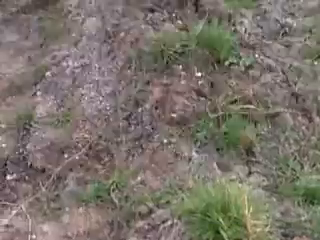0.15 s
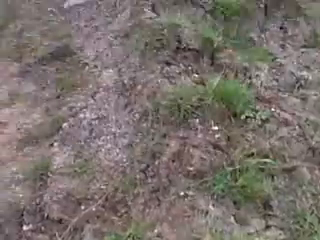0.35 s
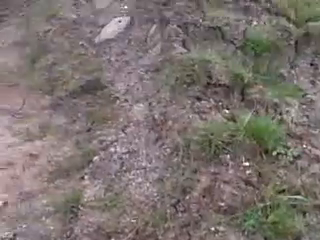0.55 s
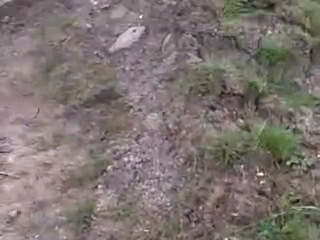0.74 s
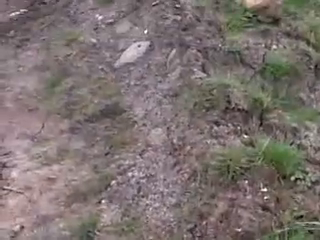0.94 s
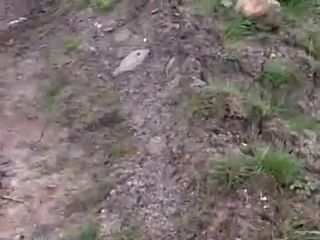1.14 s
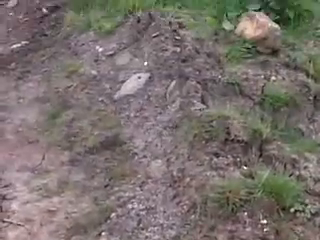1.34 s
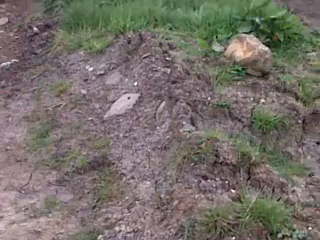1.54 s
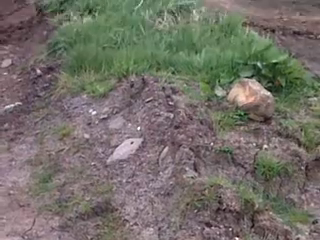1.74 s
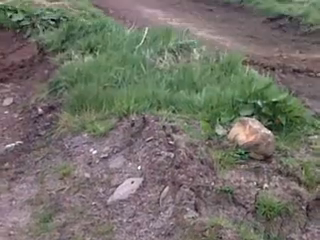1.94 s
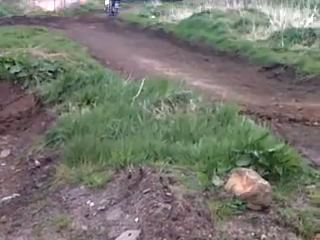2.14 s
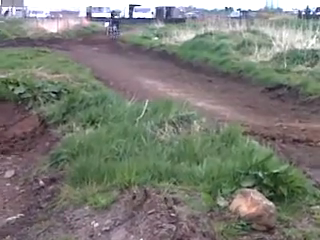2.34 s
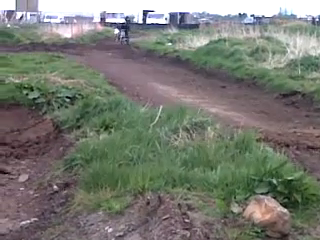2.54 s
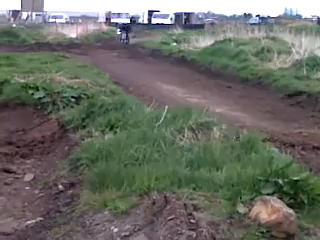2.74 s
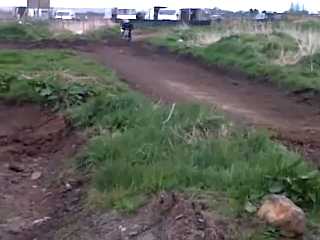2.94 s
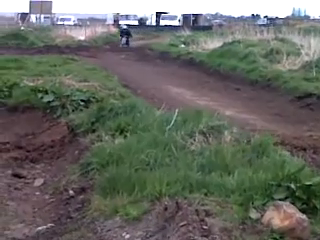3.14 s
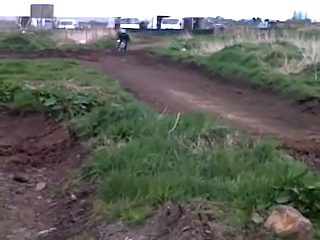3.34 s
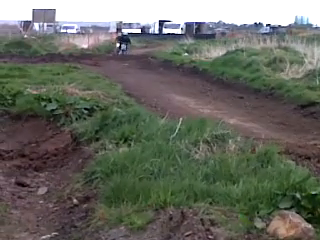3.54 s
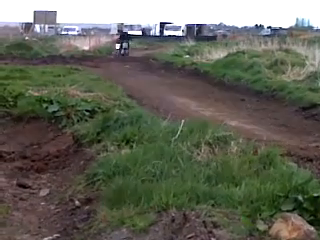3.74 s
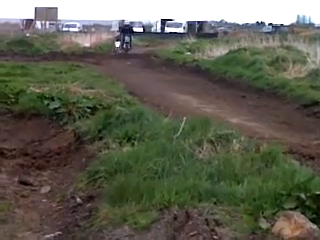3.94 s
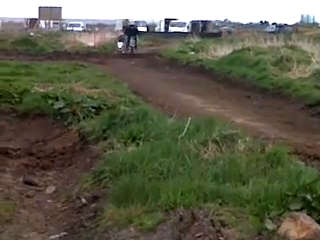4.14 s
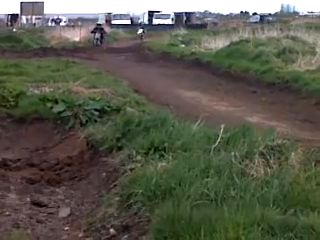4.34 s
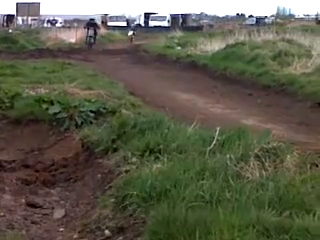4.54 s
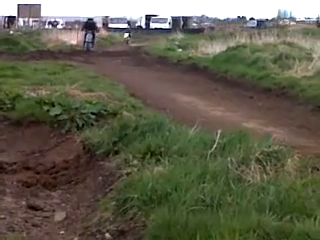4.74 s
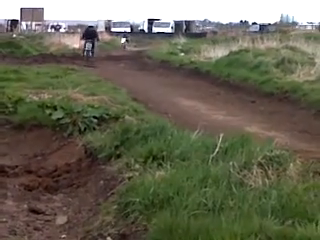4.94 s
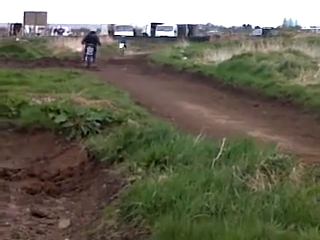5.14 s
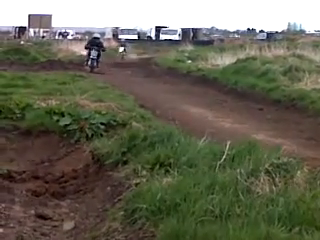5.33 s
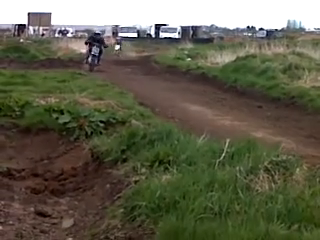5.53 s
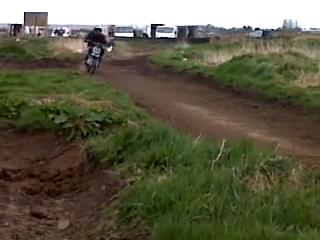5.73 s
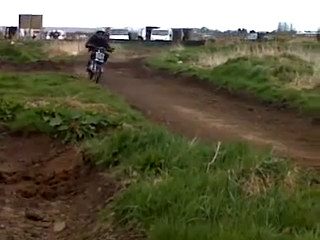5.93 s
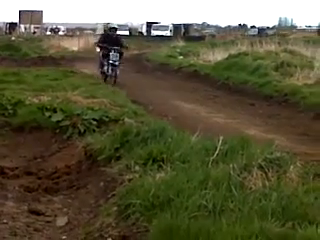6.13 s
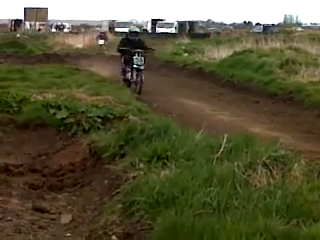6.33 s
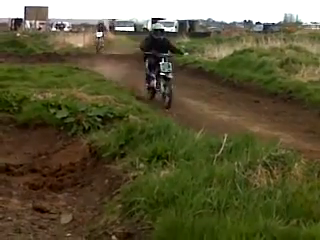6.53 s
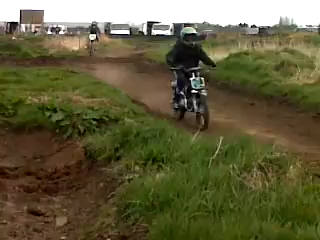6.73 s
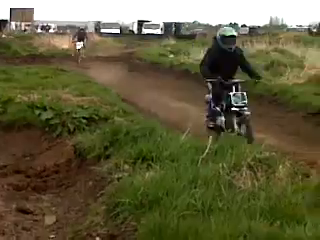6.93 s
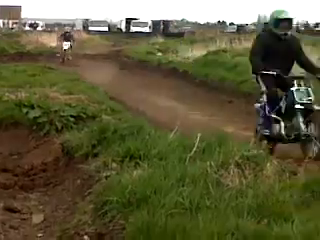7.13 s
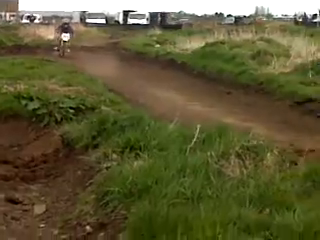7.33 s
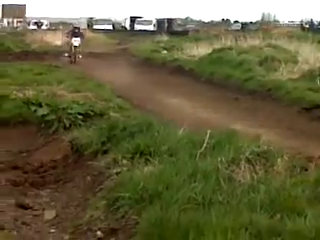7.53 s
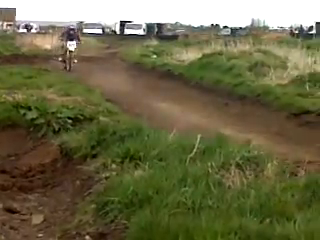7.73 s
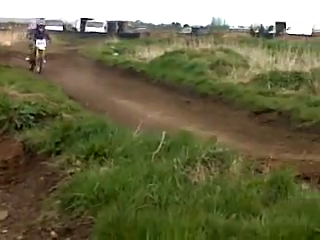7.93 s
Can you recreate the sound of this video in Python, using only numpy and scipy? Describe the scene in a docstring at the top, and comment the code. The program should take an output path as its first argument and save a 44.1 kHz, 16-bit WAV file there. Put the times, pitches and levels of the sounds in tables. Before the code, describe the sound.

Throaty little motorbike engine blips and coasts, approaching over open ground, with a distant two-stroke buzz, small clicks and a loud close finish.

```python
"""A four-stroke dirt bike revs in repeated bursts, from filtered exhaust pulses and noise, and a second one booms behind.
A scuff of grit, far-off gliding engine tones, a run of dry ticks and a dull knock on a damped body follow.
From two seconds a distant two-stroke buzzes in harmonics, with a thin gear whine; then gliding squeaks and a sharp click.
Later the chain rattles in narrow noise resonances and the exhaust crackles; at the end the first bike, now close,
draws level while a bank throws its sound back."""
import sys
import numpy as np
from scipy import signal
from scipy.fft import rfft, irfft
from scipy.io import wavfile
from scipy.ndimage import uniform_filter1d

SR = 44100
rng = np.random.default_rng(int(sys.argv[2]) if len(sys.argv) > 2 else 0)


def bounce(signal):
    """Save signal as a 16-bit WAV file at the path given by the first command-line argument."""
    frames = np.transpose(np.atleast_2d(signal))
    limited = np.clip(frames, -1, 1)
    pcm = np.round(limited * 32767).astype(np.int16)
    wavfile.write(sys.argv[1], SR, pcm)


N = 351017
TIME = np.arange(N) / SR  # s
FLARE_FADE_S = 0.045
# spectrum of the fine hiss of both the lead bike and the two-stroke: f/Hz, relative level/dB
HISS_SPECTRUM = [(1600, -26), (2100, -1.5), (2650, 0), (3200, -4), (3900, -10.5), (4500, -13), (5300, -13),
                 (5800, -21), (6600, -32)]


def from_db(db):
    """Level as amplitude ratio: 20 dB is a factor of ten."""
    return 10 ** (np.asarray(db) / 20)


def rms_one(x):
    """Normalisation by effective value: the rms becomes 1."""
    return x / np.sqrt(np.mean(x ** 2) + 1e-20)


def in_time(rows):
    """Linear interpolation: each column of a curve at every sample."""
    s, *columns = np.transpose(rows)
    return [np.interp(TIME, s, c) for c in columns]


def drift(rate):
    """Low-passed random fluctuation of rms 1: two equal poles at the given rate in Hz."""
    step = 40  # samples between slow values
    r = np.exp(-2 * np.pi * rate * step / SR)
    noise = rng.standard_normal(N // step + 2002)
    slow = signal.lfilter([1], [1, -2 * r, r * r], noise)[2000:]
    return np.interp(np.arange(N) / step, np.arange(len(slow)), rms_one(slow))


def even(x, size=5000):
    """Short-time power normalisation: the running rms is held near 1 and single pulses survive."""
    power = uniform_filter1d(uniform_filter1d(x ** 2, size), size)
    return x / np.sqrt(np.abs(power) + 1e-14)


def colour(x, points):
    """Minimum-phase filtering: a folded cepstrum gives a causal response that falls off beyond its end points."""
    size = 8192
    hz, db = np.transpose(points)
    grid = np.log(np.maximum(np.fft.rfftfreq(size, 1 / SR), 5))
    beyond = np.abs(grid - np.clip(grid, np.log(hz[0]), np.log(hz[-1])))
    gain_db = np.interp(grid, np.log(hz), db) - 30 * beyond
    cepstrum = irfft(np.log(from_db(gain_db)))
    fold = np.r_[1, np.full(size // 2 - 1, 2), 1, np.zeros(size // 2 - 1)]
    impulse_response = irfft(np.exp(rfft(cepstrum * fold)))
    return signal.oaconvolve(x, impulse_response)[:N]


def cut(x, hz, kind, order=2):
    """Butterworth low- or high-pass: maximally flat in the passband."""
    sos = signal.butter(order, min(hz, SR / 2 - 1), kind, fs=SR, output="sos")
    return signal.sosfilt(sos, x + 1e-18)


def resonance(x, hz, q):
    """Simple resonator: a band-pass with gain 1 at its centre and bandwidth hz/q."""
    return signal.lfilter(*signal.iirpeak(hz, max(q, .5), fs=SR), x)


def ramp(start, length):
    """Linear onset from 0 to 1."""
    return np.clip((TIME - start) / max(length, 1e-3), 0, 1)


def held(start, end, attack_s, release_s):
    """Trapezoidal envelope: attack from start, hold, release from end."""
    return ramp(start, attack_s) * (1 - ramp(end, release_s))


def glides(rows, unsteady, flutter_db):
    """Frequency modulation: phase integrates a gliding, wavering frequency; each tone swells as half a sine."""
    out, waver = np.zeros(N), 1 + unsteady * drift(60)
    for s, length, start_hz, end_hz, db in rows:
        along = np.clip((TIME - s) / length, 0, 1)
        hz = (start_hz + (end_hz - start_hz) * along) * waver
        out += from_db(db) * np.sin(np.pi * along) * np.sin(2 * np.pi * np.cumsum(hz) / SR)
    return out * from_db(flutter_db * drift(31))


def revving(revs):
    """Engine kinematics: revs climb while the throttle is open and coast down until the next twist."""
    coast_easing = 1.6
    throttle_open_s, throttle_shut_s = 0.096, 0.24
    speed, throttle, last_shut, last_top = revs[0][2], 0, -1, revs[0][2]
    for opens, shuts, low, top, easing, amount in revs:
        coast = 1 - (1 - ramp(last_shut, opens - last_shut)) ** coast_easing
        climb = 1 - (1 - ramp(opens, shuts - opens)) ** easing
        speed = speed + (low - last_top) * coast + (top - low) * climb
        throttle = throttle + amount * held(opens, shuts, throttle_open_s, throttle_shut_s)
        last_shut, last_top = shuts, top
    return speed, np.clip(throttle, 0, 1)


def firings(per_s, uneven_db, wander, jitter_s):
    """Quasi-periodic pulse train: one click per firing, varying in strength and timing."""
    turns = np.cumsum(per_s * (1 + wander * drift(8.34))) / SR
    at = np.flatnonzero(np.diff(np.floor(turns)))
    chance = rng.standard_normal((len(at), 2))
    spread_db = np.broadcast_to(uneven_db, N)[at]
    moved = at + (jitter_s * SR * chance[:, 1]).astype(int)
    pulses = np.zeros(N)
    pulses[np.clip(moved, 0, N - 1)] = from_db(spread_db * np.minimum(chance[:, 0], 1.5))
    return pulses


def gas_bursts(pulses, decay_s):
    """Turbulence noise: each pulse starts an exponentially decaying gush."""
    envelope = signal.lfilter([1], [1, -np.exp(-1 / (decay_s * SR))], pulses + 1e-18)
    return envelope * rng.standard_normal(N)


def blend(a, b, share):
    """Power addition of incoherent sounds; share belongs to the first."""
    share = np.clip(share, 0, 1)
    return np.sqrt(share) * even(a) + np.sqrt(1 - share) * even(b)


def lead_boom(pulses, pop_share):
    """Acoustic filtering by the silencer: pulses excite it, ringing hollower on a shut throttle."""
    # silencer response under load: f/Hz, relative level/dB
    loaded_silencer = [(50, -24), (78, -11), (106, 3), (130, 1), (162, 1), (215, -3), (265, -8), (340, -16),
                       (480, -34)]
    # silencer response when coasting: f/Hz, relative level/dB
    hollow_silencer = [(50, -26), (78, -14), (105, 2.5), (155, 3), (205, 1), (270, -7), (340, -13.5),
                       (480, -34.5)]
    loaded = even(colour(-pulses, loaded_silencer))
    coasting = even(colour(-pulses, hollow_silencer))
    return even(pop_share * loaded + (1 - pop_share) * coasting)


def lead_pop(pulses, gush):
    """Monopole radiation at the tailpipe: bare pressure pulses with a little turbulence."""
    # spectrum of the bare pulse: f/Hz, relative level/dB
    pop_spectrum = [(180, -14.5), (400, -4.5), (700, 1), (1100, -2), (1800, -10.5), (2800, -22),
                    (4000, -43.5)]
    return even(colour(blend(-pulses, gush, share=0.95), pop_spectrum))


def lead_bark(pulses, churn, pop_share):
    """Mixed excitation of one band: sharp pulses stand out of mechanical noise as their share grows."""
    # spectrum of the bark: f/Hz, relative level/dB
    bark_spectrum = [(200, -33), (290, -5), (410, -1), (520, -1), (680, 2), (900, -5), (1200, -21),
                     (2000, -49.5)]
    return blend(colour(-pulses, bark_spectrum), colour(churn, bark_spectrum), 0.76 * pop_share)


def lead_clatter(pulses, gush, churn, pop_share):
    """Structure-borne noise: mechanical churn fills the gaps between pulses and gushes."""
    # spectrum of the clatter: f/Hz, relative level/dB
    clatter_spectrum = [(600, -32), (850, -1.5), (1050, 3), (1300, -0.5), (1550, 0.5), (1850, -5),
                        (2050, -12), (2700, -38.5)]
    beats = colour(blend(-pulses, gush, share=0.34), clatter_spectrum)
    return blend(beats, colour(churn, clatter_spectrum), 0.1 + 0.61 * pop_share)


def lead_roar(pulses):
    """Pulse-modulated jet noise: firings and decaying gushes join in a close roar."""
    # spectrum of the roar: f/Hz, relative level/dB
    roar_spectrum = [(170, -19.5), (250, 4.5), (330, 1.5), (420, 8.5), (520, -12), (900, -16.5),
                     (1400, -5.5), (1900, -24), (2600, -38)]
    gush = gas_bursts(pulses, decay_s=0.0068)
    return even(colour(blend(-pulses, gush, share=0.43), roar_spectrum))


def lead_rasp(pulses, gush):
    """High-frequency turbulence: pulses and gushes through an upper band."""
    # spectrum of the rasp: f/Hz, relative level/dB
    rasp_spectrum = [(1800, -20), (2100, -7), (2350, -0.5), (2700, 2.5), (2900, -4), (3150, -3.5),
                     (3500, -20), (3900, -36), (4600, -21.5), (5300, -30.5), (6500, -51)]
    return even(colour(blend(pulses, gush, share=0.42), rasp_spectrum))


def lead_hiss(churn):
    """Amplitude-modulated noise: the coloured churn flutters at random."""
    flutter_db = 2.1
    return even(colour(churn, HISS_SPECTRUM)) * from_db(flutter_db * drift(21.0))


def lead_bike():
    """Source superposition: voices from one pulse train and mechanical noise follow distance, throttle and pipe."""
    # twists of the throttle: opening t/s, shutting t/s, firings per s at opening, at shutting,
    # easing of the climb (1 = straight), throttle (0-1)
    lead_revs = [(0.02, 0.42, 65.0, 69.0, 1.0, 0.3), (0.88, 1.22, 55.0, 77.5, 1.0, 0.35),
                 (1.49, 2.24, 46.5, 63.0, 1.1, 0.45), (3.04, 3.574, 44.632, 63.522, 1.951, 1.0),
                 (3.889, 4.37, 49.252, 63.301, 0.702, 0.9), (5.448, 5.955, 46.088, 52.517, 1.43, 0.65),
                 (6.199, 6.4, 52.794, 56.566, 1.105, 0.75), (6.461, 6.613, 55.858, 55.033, 0.981, 0.75),
                 (6.909, 7.284, 47.375, 53.185, 2.021, 0.7), (7.536, 7.958, 48.419, 59.029, 1.562, 0.88)]
    # approach: t/s, level/dB relative to the closest
    approach = [(0, -17), (.6, -18.5), (1.25, -17), (1.8, -15.5), (2.4, -14.5), (3.0, -16.5), (3.6, -15),
                (4.4, -13), (5.3, -11), (6.2, -8.5), (6.9, -7.5), (7.5, -5), (7.96, -1)]
    # treble gain on rasp and hiss: t/s, level/dB
    treble_curve = [(0, 7), (.6, 5.5), (2.0, 6), (4.5, 3.5), (5.2, 3.5), (5.8, 1.5), (6.4, 1), (6.9, -2.5),
                    (7.27, 0), (7.55, -1.5), (7.96, -2)]
    # share of sharp pops: when coasting, added by full throttle, added by the pipe in view
    pop_law = (0.1, 0.66, 0.71)
    # level laws of the voices: level/dB at 0 dB approach and shut throttle, level gained per dB of approach,
    # level/dB added by full throttle, level/dB added by the pipe in view; treble is extra for rasp and hiss
    boom_law = (-21.5, 1.0, 2.5, 0.5)
    pulse_law = (-43, 1.0, 3, 12)
    bark_law = (-40, 0.65, 6.5, 7.5)
    clatter_law = (-32, 0.9061, 0, 3)
    roar_law = (-34.5, 10, -4.5, 10)
    rasp_law = (-46.5, 1.62, 4.5, 4)
    hiss_law = (-41, 1.82, 1, -2.5)
    speed, throttle = revving(lead_revs)
    near_db, = in_time(approach)
    # as the bike draws level, its tailpipe swings into view
    in_view = ramp(7.05, 0.11)
    pop_share = np.clip(pop_law[0] + pop_law[1] * throttle + pop_law[2] * in_view, 0, 1)
    # the engine fires unevenly while the revs fall
    rev_slope = uniform_filter1d(np.gradient(speed) * SR, size=4000)
    overrun = np.clip(-rev_slope / 30, 0, 1)
    pulses = firings(speed, uneven_db=0.03 + 1.7 * overrun, wander=.0008, jitter_s=.00003)
    gush = gas_bursts(pulses, decay_s=0.0047)
    # noise of valve gear, chain and tyres swells slightly with each firing cycle and drifts
    throb = from_db(0.18 * np.cos(2 * np.pi * np.cumsum(speed) / SR) + 1.0 * drift(18))
    churn = throb * rng.standard_normal(N)
    treble = from_db(in_time(treble_curve)[0])
    voices = [(lead_boom(pulses, pop_share), boom_law),
              (lead_pop(pulses, gush), pulse_law),
              (lead_bark(pulses, churn, pop_share), bark_law),
              (lead_clatter(pulses, gush, churn, pop_share), clatter_law),
              (lead_roar(pulses), roar_law),
              (treble * lead_rasp(pulses, gush), rasp_law),
              (treble * lead_hiss(churn), hiss_law)]
    bike = exhaust_crackle(pulses)
    for voice, (db, follows, throttle_db, view_db) in voices:
        level_db = db + follows * near_db + throttle_db * throttle + view_db * in_view
        bike = bike + voice * from_db(level_db)
    return ground_dip(bank_echo(flare(bike)), near_db) + ticking(pulses)


def flare(x):
    """Parallel resonance: a band-passed copy raises or lowers single bands for a while, fuller or hollower."""
    # flares: start t/s, release t/s, centre f/Hz, Q, gain at the centre as level/dB
    flares = [(0, 1.448, 1000, 3.2, 3), (1.85, 2.799, 2100, 5.2, 4), (2.15, 2.26, 1500, 1.4, -3),
              (2.414, 2.56, 1200, 0.88, 3), (4.451, 5.45, 430, 4, -3), (4.444, 5.503, 2560, 2.5, -3.5),
              (3.05, 4.3, 880, 3.3, -3.5), (3.051, 3.614, 555, 5.3, 7), (5.5, 6.6, 349, 7.1, 3.5),
              (5.406, 6.648, 1570, 4, 3.5), (6.65, 7.17, 179, 3.6, 6), (6.65, 7.01, 480, 1.05, -6.5),
              (7.174, 7.79, 1792, 11.5, 6), (7.357, 7.493, 416, 5.9, 7), (7.313, 7.627, 1000, 1.4, -2),
              (7.53, 7.797, 754, 5.5, 5), (7.55, 7.966, 167, 3.8, -22), (7.55, 7.78, 380, 2, -2),
              (7.553, 7.779, 2740, 17, 5.5), (7.792, 7.927, 407.5, 25, 8.5), (7.803, 7.96, 636, 2.3, -3),
              (7.78, 7.91, 1210, 2.8, 5), (7.853, 7.963, 237, 5.6, 5.5)]
    for start, end, hz, q, db in flares:
        x = x + (from_db(db) - 1) * held(start, end, FLARE_FADE_S, FLARE_FADE_S) * resonance(x, hz, q)
    return x


def ground_dip(x, near_db):
    """Ground interference: reflection off soft ground hollows the middle from afar and fills in on approach."""
    dip_hz, dip_q, dip_depth = 601, 1.23, 0.63
    from_level_db, span_db = -14.5, 2.5  # along the approach
    far = np.clip((from_level_db - near_db) / span_db, 0, 1)
    return x - dip_depth * far * resonance(x, dip_hz, dip_q)


def second_bike():
    """Distance filtering: only boom and low rumble carry, the puffs smeared by scattering."""
    # twists of the throttle: opening t/s, shutting t/s, firings per s at opening, at shutting,
    # easing of the climb (1 = straight), throttle (0-1)
    follower_revs = [(0.08, 0.36, 31.91, 39.5, 1.01, 0.3), (0.68, 1.48, 35, 43.25, 1.01, 0.5),
                     (1.7, 2.35, 38, 42.96, 1.0, 0.79), (3.24, 3.56, 36.21, 43.47, 0.78, 0.26),
                     (3.82, 4.62, 40.27, 43.21, 1.097, 0.63), (5.76, 6.5, 33.64, 43.52, 1.43, 0.55),
                     (7.08, 7.24, 36.75, 40.96, 0.77, 0.42)]
    # silencer response: f/Hz, relative level/dB
    follower_silencer = [(65, -22), (95, -3.5), (125, 5), (168, 7), (215, 3), (280, -2.5), (350, -7.5),
                         (480, -38.5)]
    # spectrum of the low rumble: f/Hz, relative level/dB
    rumble_spectrum = [(20, -14.5), (36, -22.5), (52, -3.5), (70, -1.5), (95, 3.5), (160, -5.5), (400, -36)]
    # approach: t/s, level/dB on a shut throttle
    follower_approach = [(0, -39.5), (.7, -40), (1.4, -35), (2.3, -35), (3.9, -38), (4.6, -31), (5.4, -33),
                         (6.7, -28), (7.96, -27.5)]
    full_throttle_db, rumble_db = -2.5, -11
    speed, throttle = revving(follower_revs)
    pulses = firings(speed, uneven_db=3.0, wander=0.01, jitter_s=0.00025)
    puffs = blend(pulses, gas_bursts(pulses, decay_s=0.037), share=0.42)
    boom = even(colour(puffs, follower_silencer))
    rumble = rms_one(colour(rng.standard_normal(N), rumble_spectrum))
    level_db = in_time(follower_approach)[0] + full_throttle_db * throttle
    return from_db(level_db) * (boom + from_db(rumble_db) * rumble)


def grit(per_s=90, size_db=0.0):
    """Random impact noise: sparse tiny cracks of gravel, each a decaying burst, in a middle band."""
    # scuffs underfoot: t/s, time to the release/s, level/dB
    scuffs = [(0.048, 0.2, -60.5), (1.9, 0.082, -55.5)]
    fade_s = 0.054
    cracks = (rng.random(N) < per_s / SR) * from_db(size_db * rng.standard_normal(N))
    crunch = cut(cut(gas_bursts(cracks, decay_s=0.0017), 1500, "high"), 2900, "low", order=4)
    swell = sum(from_db(db) * held(s, s + length, fade_s, fade_s) for s, length, db in scuffs)
    return rms_one(crunch) * swell


def far_engines():
    """Frequency glide: far-off engines rise and fall as short, unsteady pure tones."""
    # blips: t/s, length/s, start f/Hz, end f/Hz, peak level/dB before flutter
    far_blips = [(.08, 0.19, 195.3, 254, -35.5), (.68, 0.46, 199.4, 285.5, -40.5),
                 (1.35, 0.36, 233, 313.5, -35.5), (1.85, 0.29, 282, 319, -37), (2.0, .3, 233, 258.3, -37),
                 (2.38, 0.21, 237.7, 344, -35), (2.56, 0.33, 335.5, 266.3, -40), (3.1, 0.15, 185, 226, -35),
                 (3.65, 0.2, 238.5, 205, -33.5), (4.62, 0.28, 265, 296, -39), (5.72, 0.31, 553, 657, -38.5),
                 (5.78, .3, 301, 341, -35), (6.12, 0.35, 621, 672, -40), (6.42, .26, 663, 595, -39.5),
                 (6.58, 0.29, 331.4, 289.5, -39.5), (6.63, 0.2, 604, 698, -37)]
    return glides(far_blips, unsteady=0.019, flutter_db=-0.5)


def ticks():
    """Impulse response: tiny dry clicks close by, each with the same bright ring."""
    # clicks: t/s, level/dB before the ring
    tick_times = [(0.734, -24), (.756, -23), (.7765, -25), (.796, -30), (0.8058, -21), (0.832, -25),
                  (.841, -23), (.8665, -21), (0.873, -28), (.8895, -27)]
    # their ring: f/Hz, level/dB
    tick_ring = [(1700, -10), (2700, 4), (3700, -2.5), (4700, -16.5), (5400, -8), (6300, -25)]
    clicks = sum(from_db(db) * signal.unit_impulse(N, round(s * SR)) for s, db in tick_times)
    return colour(clicks, tick_ring)


def ticking(pulses):
    """Impulsively excited resonance: during one early twist every firing rings briefly and brightly."""
    # ringing stretch: start t/s, release t/s, ring f/Hz, Q, level/dB
    ring_settings = (1, 1.37, 1751, 6.5, -50.5)
    start, end, hz, q, db = ring_settings
    ring = even(resonance(resonance(pulses, hz, q), hz, q))
    return from_db(db) * held(start, end, FLARE_FADE_S, FLARE_FADE_S) * ring


def taps():
    """Modal synthesis: contacts ring a small, well damped plastic body; a soft contact is duller."""
    # contacts: t/s, level/dB, contact cut-off f/Hz
    contacts = [(1.493, -16.5, 1200), (4.376, -10.5, 5500), (4.384, -24.5, 7050), (4.394, -28, 3010)]
    # modes of the body: f/Hz, level/dB, 60 dB decay time/s
    body_modes = [(341, -11.5, 0.05), (650, -8.5, 0.02), (785, -12, 0.031), (1535, 3, 0.0065),
                  (2770, -5.5, 0.0049), (3440, -28, 0.015), (4740, -41, 0.007)]
    force, out = np.zeros(N), 0
    for s, db, contact_hz in contacts:
        force += from_db(db) * cut(signal.unit_impulse(N, round(s * SR)), contact_hz, "low", order=6)
    for hz, db, t60 in body_modes:
        r, w = from_db(-60 / (t60 * SR)), 2 * np.pi * hz / SR
        out = out + from_db(db) * signal.lfilter([0, np.sin(w)], [1, -2 * r * np.cos(w), r * r], force)
    return out


def two_stroke(low_count=5, middle_count=4):
    """Fourier synthesis: harmonics of the firing rate, each fading in the moving air, a whine and a little hiss."""
    # firing rate: t/s, firings per s
    two_stroke_speed = [(2.0, 157), (2.16, 163.2), (2.44, 168.8), (2.94, 163.2), (3.14, 167.9),
                        (3.38, 165.3), (3.6, 168), (4.16, 168.5), (4.34, 165.4), (4.6, 169), (5.3, 158.4),
                        (5.6, 169.7), (5.98, 167), (6.14, 173.7), (6.28, 172.2), (6.34, 166.7), (6.47, 166),
                        (6.8, 166.7)]
    # overtones: multiple of the firing rate, level/dB relative within their group
    two_stroke_orders = [(2, -13), (3, -11), (4, -11.5), (5, -20), (6, -19), (7, -12), (8, -22), (9, -17.5),
                         (10, -19), (12, -25), (13, -19.5), (14, -18), (15, -22.5), (16, -20), (17, -23),
                         (18, -24.5), (19, -26.5), (20, -31), (21, -29), (22, -32), (24, -37), (25, -35),
                         (27, -43), (29, -43), (30, -43), (31, -37), (32, -36), (33, -45), (36, -44)]
    # audible stretches: start t/s, release t/s, then level/dB of fundamental, low, middle and high overtones, whine
    two_stroke_pulls = [(2.022, 2.95, -41, -52, -51.5, -55, -58.5),
                        (2.945, 3.607, -44, -52, -49.5, -54, -55.5),
                        (3.599, 4.31, -37, -53, -49, -53.5, -47.5), (4.42, 5.25, -35, -50, -57, -68, -80.5),
                        (5.927, 6.24, -40, -36, -40, -48, -47.5),
                        (6.276, 6.43, -35, -40.5, -40, -49.5, -42), (6.5, 6.745, -32.5, -60, -66, -70, -68)]
    fade_s, whine_order = 0.12, 11
    hiss_db = -8  # relative to the high overtones
    speed, = in_time(two_stroke_speed)
    hum, low, middle, high, whine = sum(np.outer(from_db(dbs), held(start, end, fade_s, fade_s))
                                        for start, end, *dbs in two_stroke_pulls)
    phase = 2 * np.pi * np.cumsum(speed * (1 + 0.00068 * drift(17.5))) / SR
    overtones = [from_db(db + 2.5 * drift(7.0)) * np.sin(round(k) * phase + 2 * np.pi * rng.random())
                 for k, db in two_stroke_orders]
    groups = np.split(np.array(overtones), [low_count, low_count + middle_count])
    lows, middles, highs = (rms_one(group.sum(0)) for group in groups)
    fundamental = hum * from_db(2.0 * drift(12.0)) * np.sin(phase)
    piercing = whine * from_db(1.2 * drift(9.9)) * np.sin(whine_order * phase)
    tones = np.sqrt(2) * (fundamental + piercing)
    pulsing_noise = (1 + np.cos(phase)) * rng.standard_normal(N)
    hiss = from_db(hiss_db) * rms_one(colour(pulsing_noise, HISS_SPECTRUM))
    return tones + low * lows + middle * middles + high * (highs + hiss)


def gear_whine():
    """Tonal gear noise: a thin, smooth tone rises and then sinks."""
    # glides: t/s, length/s, start f/Hz, end f/Hz, peak level/dB before flutter
    whine_glides = [(2.25, 0.51, 3960, 4160, -63.5), (2.6, 0.55, 4170, 3970, -63)]
    return glides(whine_glides, unsteady=0.00078, flutter_db=0.5)


def squeaks():
    """Frequency glide: short, unsteady tones that fall in pitch."""
    # squeaks: t/s, length/s, start f/Hz, end f/Hz, peak level/dB before flutter
    squeak_glides = [(3.525, 0.029, 1502, 1350, -39), (4.169, 0.05, 1329, 1236, -43),
                     (4.214, 0.041, 1257, 1243, -32), (4.291, 0.05, 1405, 1314, -34.5),
                     (4.319, 0.029, 1343, 1340, -26.5)]
    return glides(squeak_glides, unsteady=0.013, flutter_db=-2.5)


def chain():
    """Noise-excited resonance: each rattle is a swell of noise in a narrow steel resonance."""
    # rattles: t/s, length/s, ring f/Hz, level/dB at the peak of the swell
    chain_rattles = [(4.823, 0.49, 5130, -64), (5.223, 0.029, 3950, -59), (5.545, .04, 3830, -55),
                     (5.595, 0.034, 3880, -52.5), (5.66, 0.027, 3950, -56), (5.74, 0.045, 3860, -54),
                     (5.797, 0.045, 3900, -54.5), (5.89, 0.053, 3880, -53), (5.936, 0.12, 3900, -56),
                     (6.66, 0.21, 5200, -71.5)]
    chain_q = 12
    shaking, out = rng.standard_normal(N), 0
    for s, length, hz, db in chain_rattles:
        ring = resonance(resonance(shaking, hz, chain_q), hz, chain_q / 2)
        out = out + from_db(db) * np.sin(np.pi * ramp(s, length)) * rms_one(ring)
    return out


def exhaust_crackle(pulses):
    """Gated impulsive noise: the hard crack of each firing is heard in stretches with abrupt edges."""
    # spectrum of the crack: f/Hz, relative level/dB
    crack_spectrum = [(2000, -15), (2450, 4), (2800, 2.5), (3250, 5), (3600, -7.5), (4100, -18.5),
                      (5000, -30)]
    # audible stretches: start t/s, release t/s, level/dB
    crackles = [(5.499, 6.13, -58), (6.145, 6.65, -49.5), (6.676, 7.03, -55.5), (7.052, 7.213, -49.5),
                (7.213, 7.296, -43), (7.33, 7.632, -66), (7.655, 7.95, -64)]
    edge_s = .015
    gush = gas_bursts(pulses, decay_s=0.00079)
    crack = even(colour(blend(pulses, gush, share=0.25), crack_spectrum))
    return crack * sum(from_db(db) * held(start, end, edge_s, edge_s) for start, end, db in crackles)


def bank_echo(x):
    """Comb filtering by reflection: a trackside bank returns each pulse sooner and sooner as the bike goes by."""
    from_s, swell_s, echo_db = 7.5, 0.18, -8
    first_delay_s, closing_s_per_s, low_cut_hz = .0095, 0.0077, 1050
    delay = first_delay_s - closing_s_per_s * np.maximum(TIME - from_s, 0)
    reflected = np.interp(TIME - delay, TIME, cut(x, low_cut_hz, "high"))
    return x + from_db(echo_db) * ramp(from_s, swell_s) * reflected


def outdoors(x, dull_hz=1800):
    """Discrete reflections: the direct sound and a few dull echoes from earth banks."""
    # echoes: delay t/s, level/dB
    echoes = [(.0025, -36), (0.028, -21), (0.057, -19), (0.11, -30)]
    dull = cut(x, dull_hz, "low")
    return x + sum(from_db(db) * np.interp(TIME - delay, TIME, dull, left=0) for delay, db in echoes)


def scene():
    """Linear superposition: all sources add at one microphone, some with echoes."""
    echoing = outdoors(lead_bike() + second_bike() + far_engines() + squeaks())
    direct = grit() + ticks() + taps() + two_stroke() + gear_whine() + chain()
    return (echoing + direct)[None]


def record(dry):
    """Band limitation: a dull little microphone, then a steep cut of the top."""
    microphone_hz, cutoff_hz = 7060, 7200
    return cut(cut(dry, microphone_hz, "low", order=8), cutoff_hz, "low", order=12)


dry = scene()
out = record(dry)
bounce(out)
```